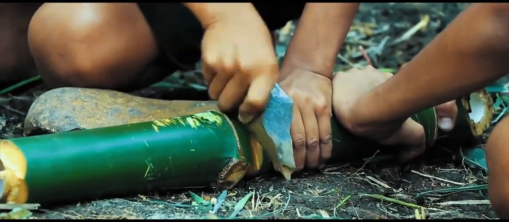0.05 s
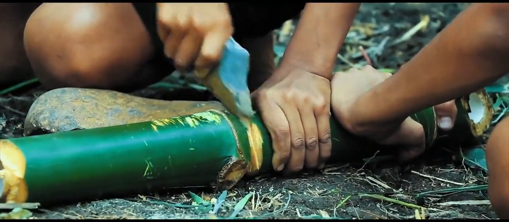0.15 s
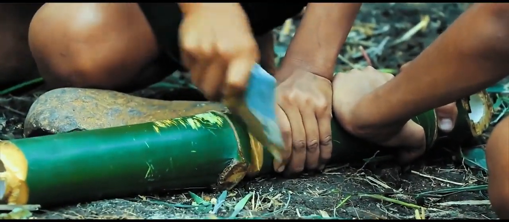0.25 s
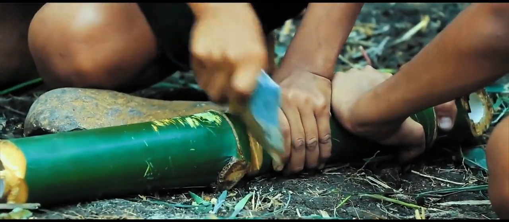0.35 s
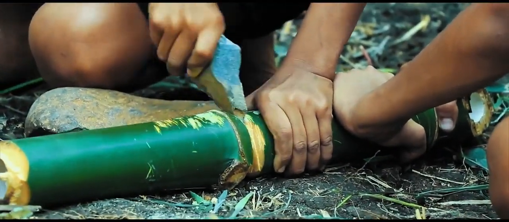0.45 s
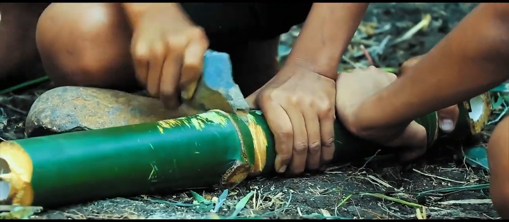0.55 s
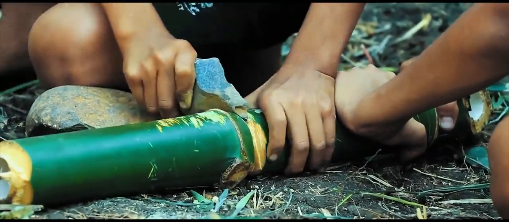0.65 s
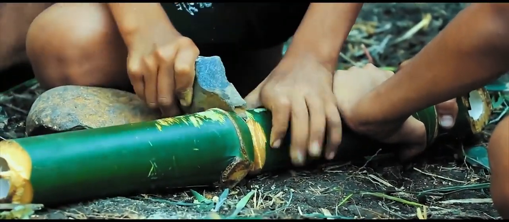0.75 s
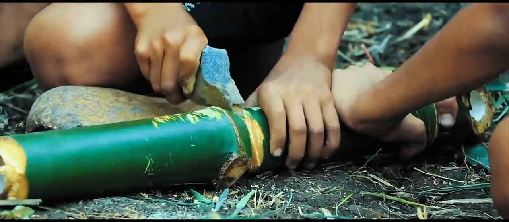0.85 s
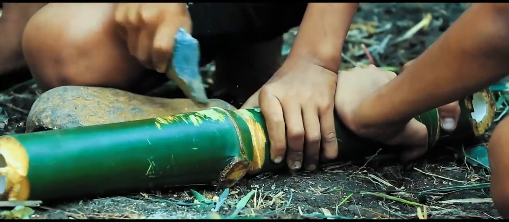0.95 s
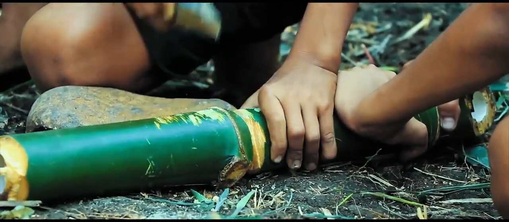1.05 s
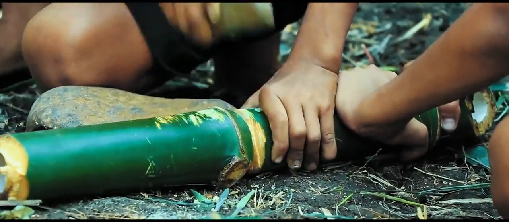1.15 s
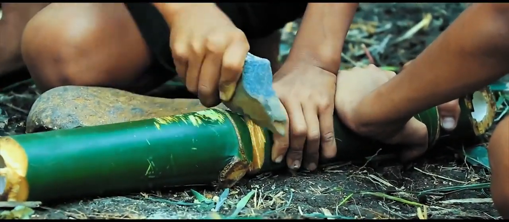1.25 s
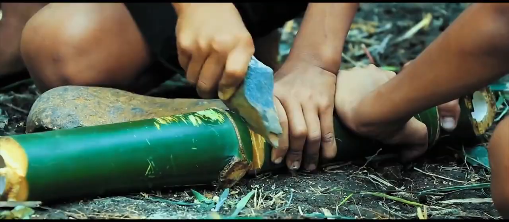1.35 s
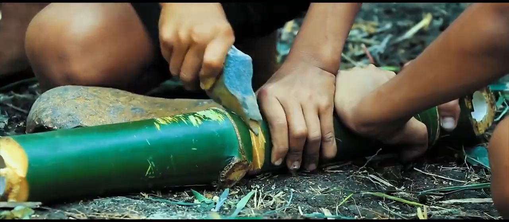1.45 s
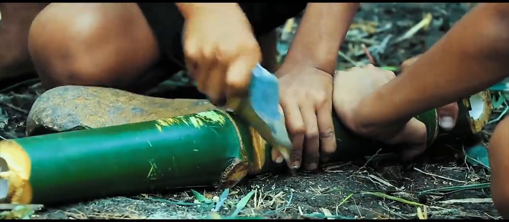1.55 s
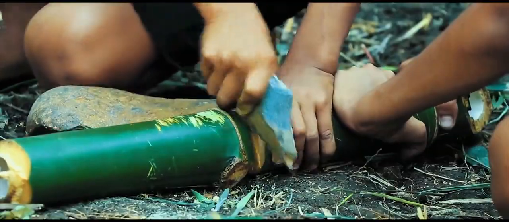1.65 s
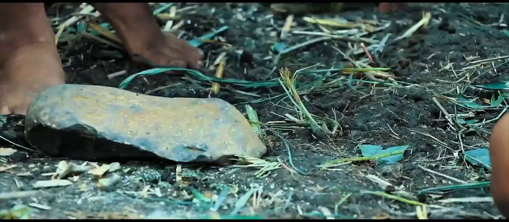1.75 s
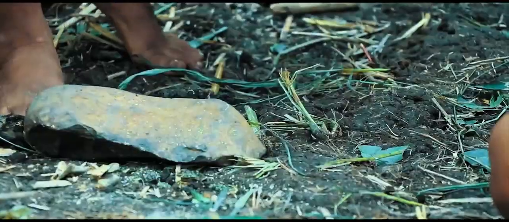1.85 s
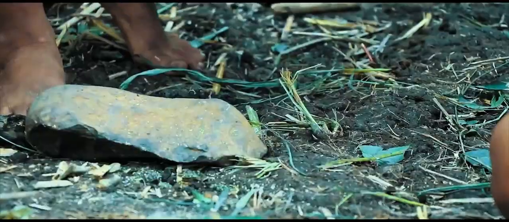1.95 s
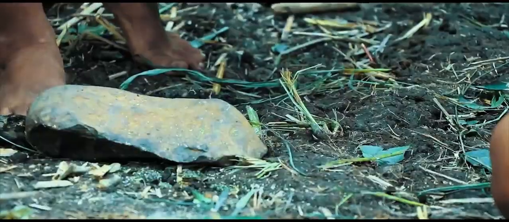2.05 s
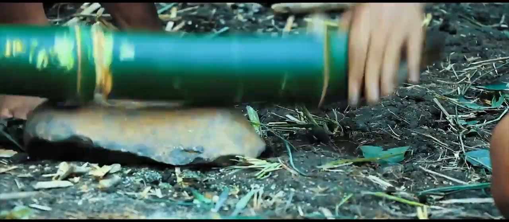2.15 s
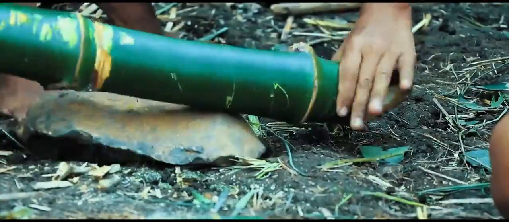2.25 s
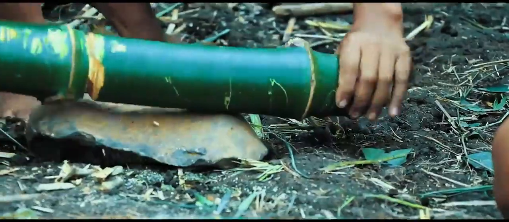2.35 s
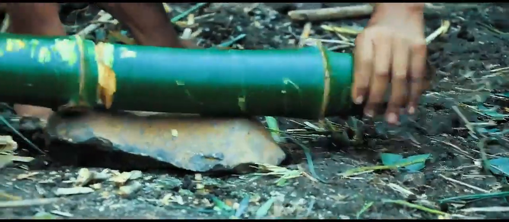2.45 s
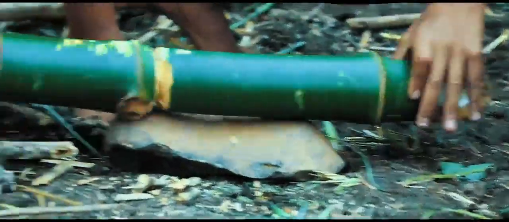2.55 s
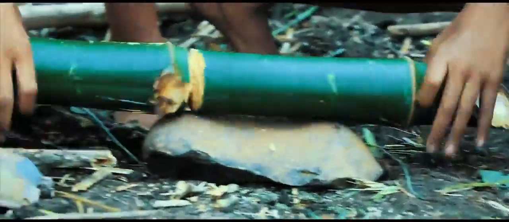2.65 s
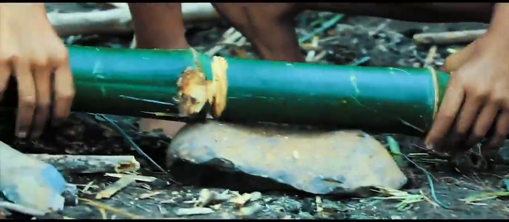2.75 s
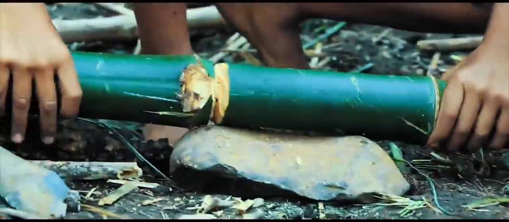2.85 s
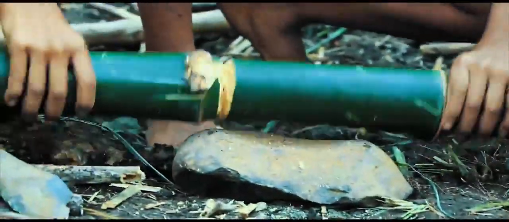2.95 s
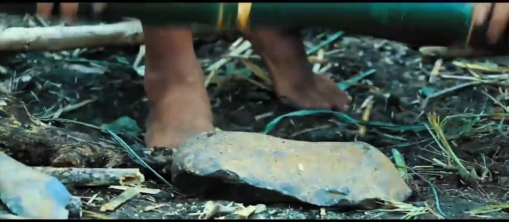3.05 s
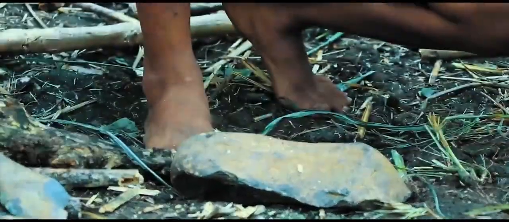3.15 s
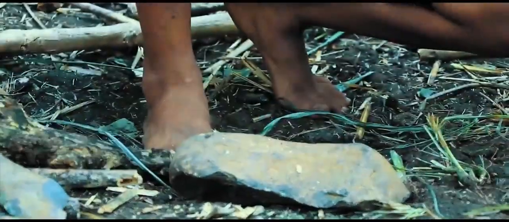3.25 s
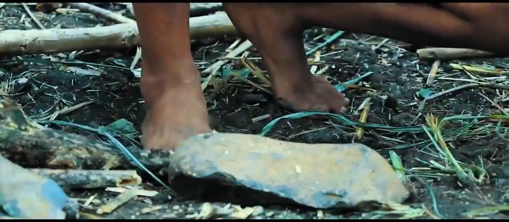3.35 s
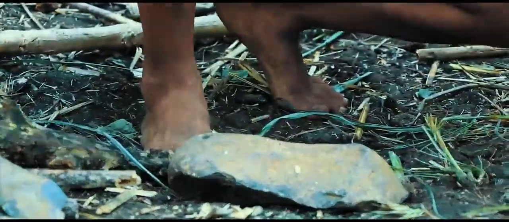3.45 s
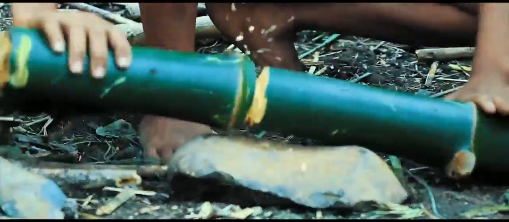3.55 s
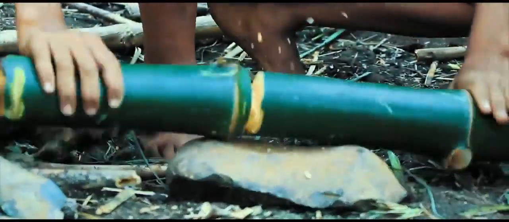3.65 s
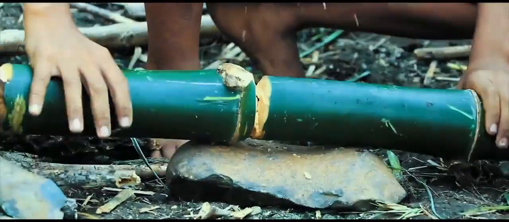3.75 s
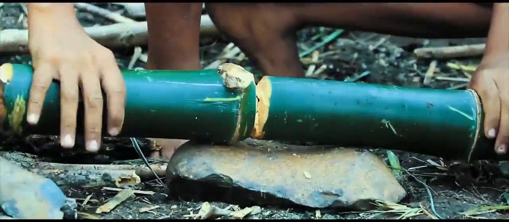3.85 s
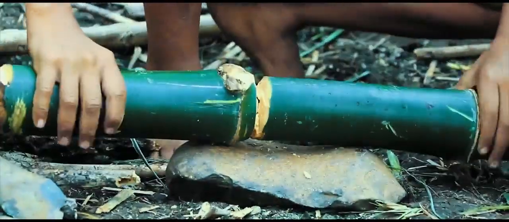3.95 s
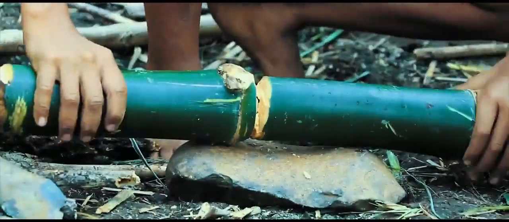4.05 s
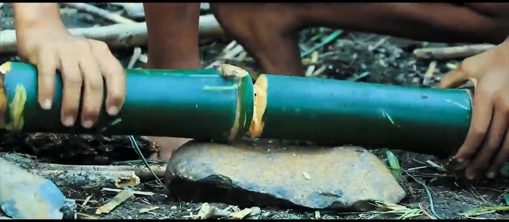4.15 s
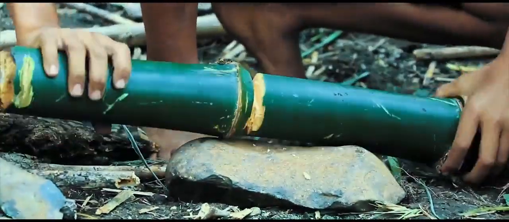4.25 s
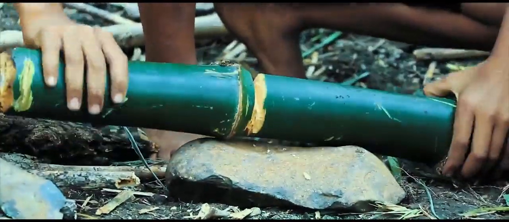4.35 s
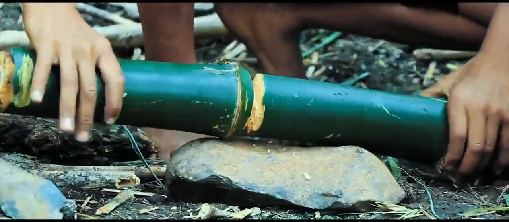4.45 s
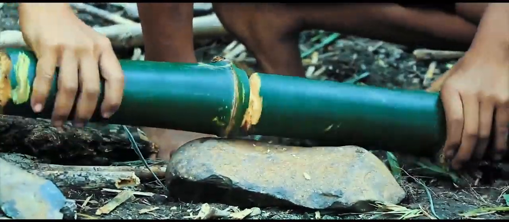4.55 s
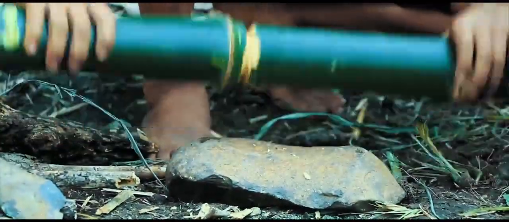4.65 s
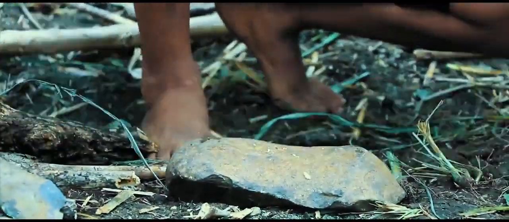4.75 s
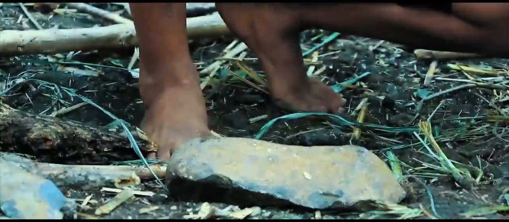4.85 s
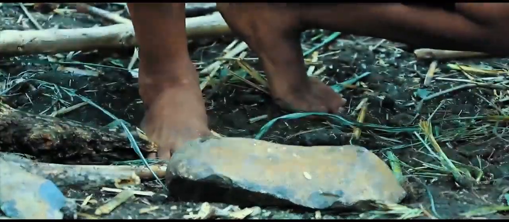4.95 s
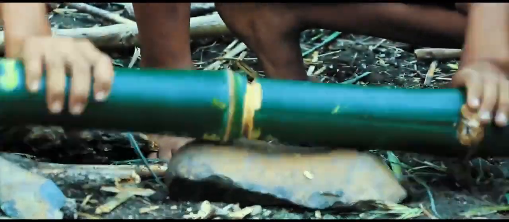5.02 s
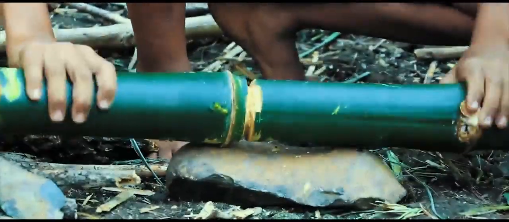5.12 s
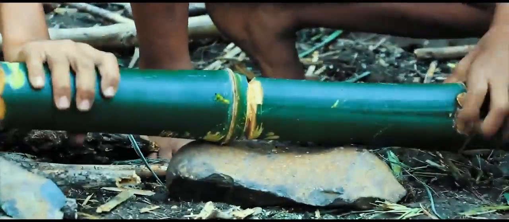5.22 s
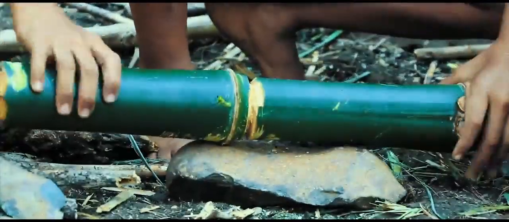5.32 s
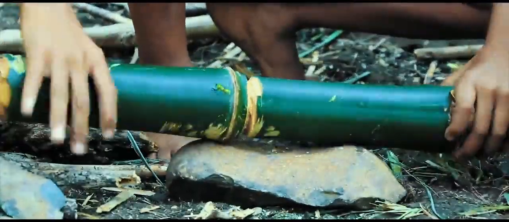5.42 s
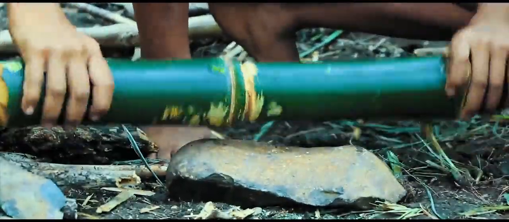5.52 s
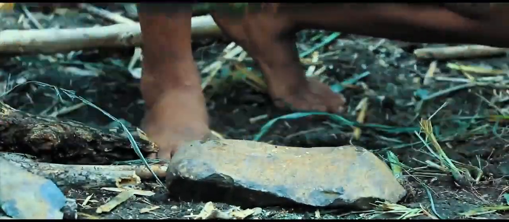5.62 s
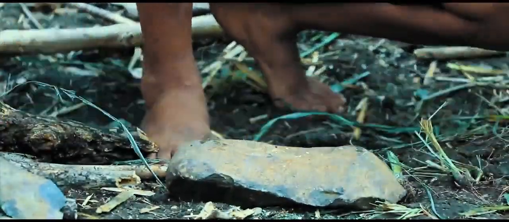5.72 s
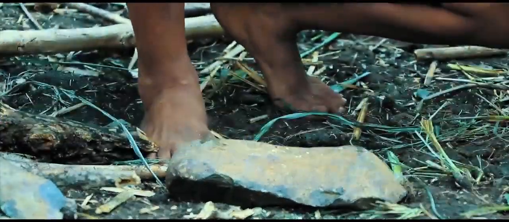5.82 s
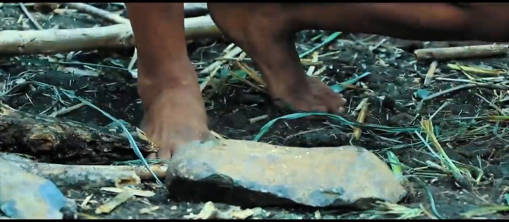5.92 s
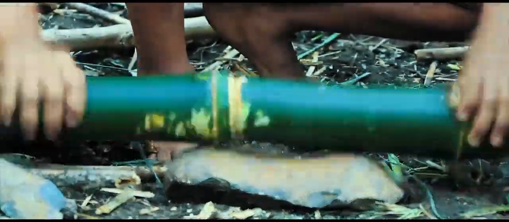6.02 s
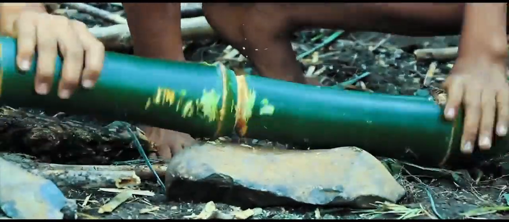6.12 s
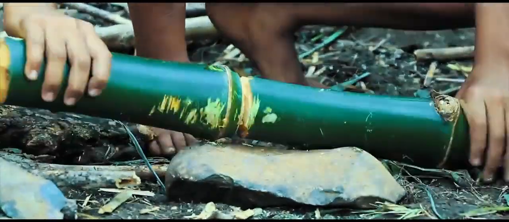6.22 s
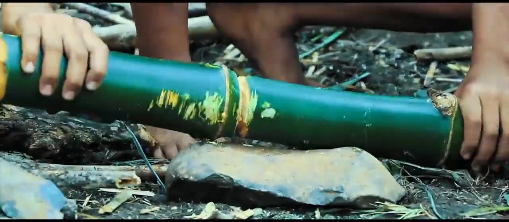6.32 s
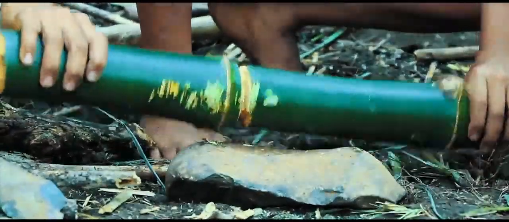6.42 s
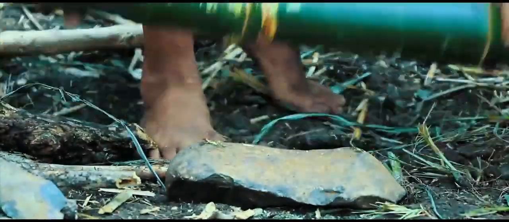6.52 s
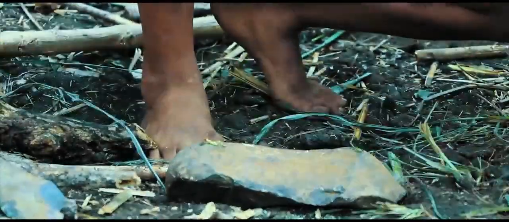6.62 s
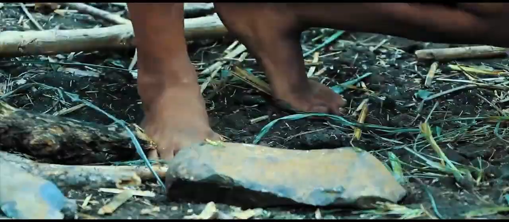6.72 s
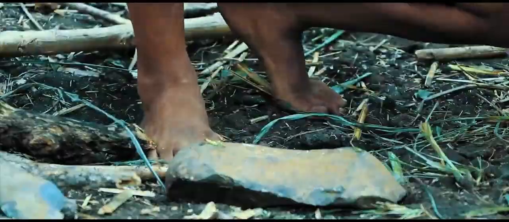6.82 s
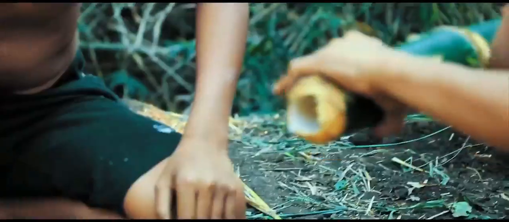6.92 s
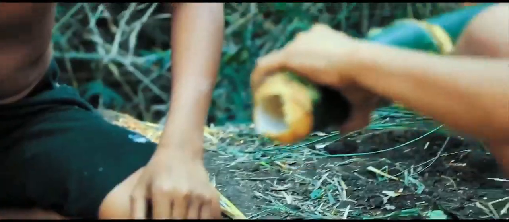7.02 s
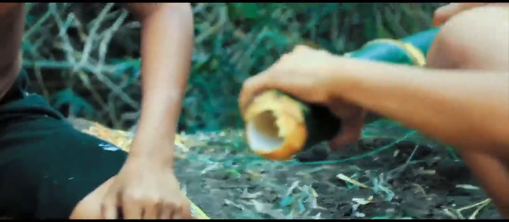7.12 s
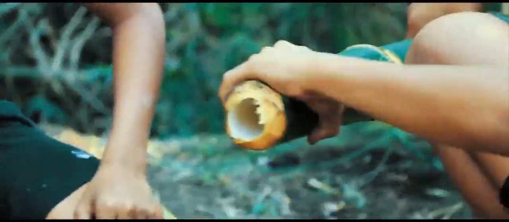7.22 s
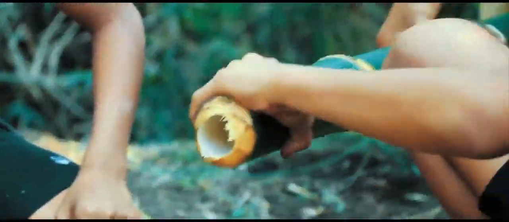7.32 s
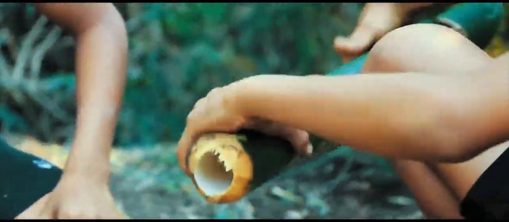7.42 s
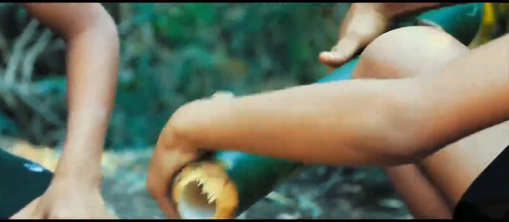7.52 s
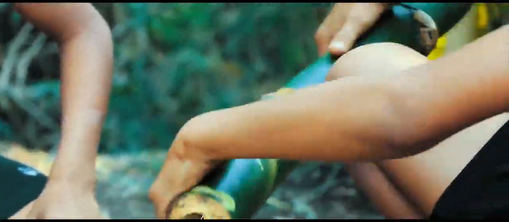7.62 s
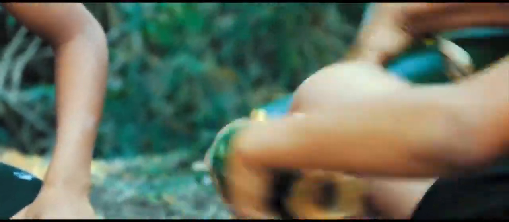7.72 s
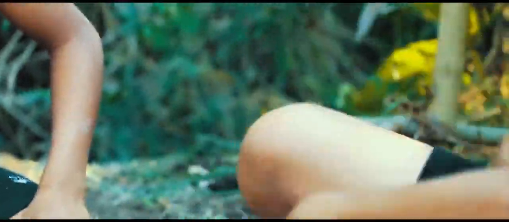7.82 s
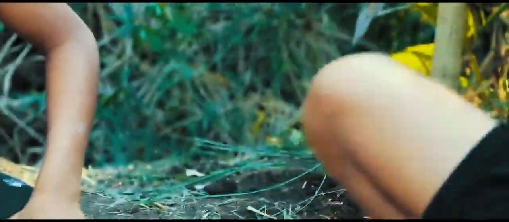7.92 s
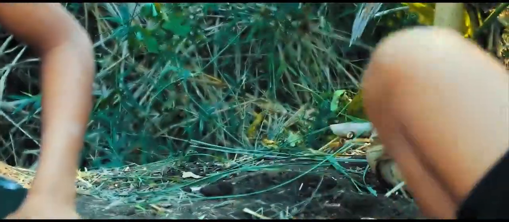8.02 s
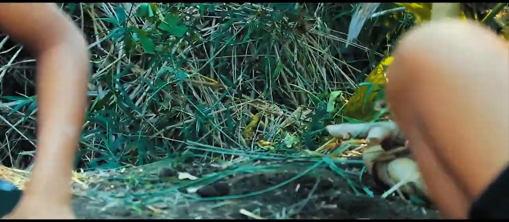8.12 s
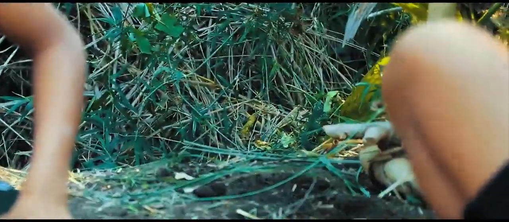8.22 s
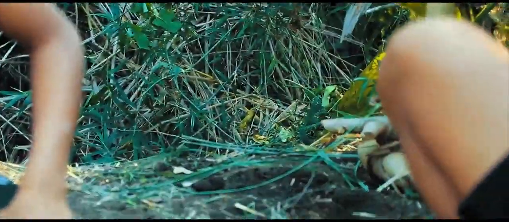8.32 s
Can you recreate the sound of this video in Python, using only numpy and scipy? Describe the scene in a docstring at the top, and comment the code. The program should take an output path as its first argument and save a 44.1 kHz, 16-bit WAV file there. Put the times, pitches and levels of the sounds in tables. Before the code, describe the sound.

A stone blade pecks and scrapes at green bamboo, then the tube slams four times on rock and its fibres rip, outdoors among insects.

```python
"""A forest floor, a spaced stereo pair close to green bamboo; insects hiss, a far bird trills, faint hoots pass.
First a stone blade pecks and scrapes at the tube: snapping fibres drive the modes of its wall and air.
From 2.2 s the tube is slammed on a rock four times, with rebounds, soil bumps, knocks, clicks and rubs.
Near 7.8 s its fibres strain and rip in dense snaps, a strip splits with falling pitch, and bits settle.
Ground and trees scatter the contacts and the bird back to the microphones."""
import sys
import numpy as np
from scipy import signal
from scipy.fft import rfft, irfft, next_fast_len
from scipy.io import wavfile
from scipy.ndimage import uniform_filter1d

SR = 44100
rng = np.random.default_rng(int(sys.argv[2]) if len(sys.argv) > 2 else 0)


def wav_out(sig):
    """Save sig, one row per channel (or a flat mono array), as 16-bit PCM at SR to the path in sys.argv[1]."""
    wavfile.write(sys.argv[1], SR, np.round(np.clip(np.atleast_2d(sig).T, -1, 1) * 32767).astype(np.int16))


N = 369544

# forest air, relative spectrum: (frequency [Hz], density [dB per Hz])
AIR_SPECTRUM = [(20, -15), (35, -5), (55, 2.5), (80, -6), (170, -10.5), (300, -9.5), (600, -14.5),
                (1300, -18), (2000, -22), (5300, -29), (7500, -28.5), (11000, -34.5), (15500, -46.5)]
# forest air over time: (time [s], level [dB])
AIR_LEVEL = [(0, -48), (.6, -52), (.9, -49), (1.3, -52), (4.2, -53), (8.38, -52)]
# insect bands: (centre [Hz], width [Hz], level [dB])
INSECT_BANDS = [(4516, 240, -77), (6650, 680, -68), (7640, 40, -75), (7900, 220, -75)]
# likeness of the air at the two microphones: (frequency [Hz], correlation [-1 to 1])
MIC_LIKENESS = [(60, 0.84), (180, 0.34), (550, 0.26), (1650, 0.04), (4970, 0.01), (15000, 0.03)]
# left minus right of the microphone pair: (frequency [Hz], difference [dB])
MIC_BALANCE = [(100, 1.26), (400, 1.85), (650, 1.29), (870, 3.43), (1050, -1.5), (1320, 3.89), (1700, -2.5),
               (2200, -4), (3000, -2), (12000, -2)]
# faint hoots: (time [s], level of the lower tone [dB])
HOOTS = [(.017, -48.5), (3.461, -51.5), (7.03, -49.5)]
# bird trills: (start [s], end [s], level of the full notes [dB])
TRILLS = [(-.225, .3, -50), (0.942, 1.47, -53), (1.848, 2.37, -51), (3.099, 3.55, -49.5), (4.482, 5.0, -50),
          (5.711, 6.15, -51), (6.863, 6.97, -53), (7.34, 7.68, -53)]
# relative colour of the echo from the trees: (frequency [Hz], level [dB])
TREE_COLOUR = [(100, -13), (400, -10), (900, -4), (1700, -5), (3300, -2), (5000, -4.5), (9000, -1.5),
               (15000, -4.5)]
# relative colour of the reflections from the ground: (frequency [Hz], level [dB])
GROUND_COLOUR = [(300, -9), (1200, -1), (6000, 0), (12000, -4)]
# modes of the tube wall at ring length 1: (frequency [Hz], relative level [dB], t60 [s])
WALL_MODES = [(787, -1, 0.042), (888, 2, 0.044), (1043, 0.5, 0.066), (1190, 0.5, .04), (1425, -0.5, 0.037),
              (1633, 2, 0.054), (1800, -5, 0.046), (2100, -0.5, 0.036), (2359, -0.5, 0.038),
              (2520, -1, 0.031), (2816, -6.5, 0.051), (2980, -4, 0.033), (3313, -3.5, 0.043),
              (3502, -3, .035), (3920, -15, 0.089)]
# short high modes of splitting fibres at ring length 1: (frequency [Hz], relative level [dB], t60 [s])
SPLINTER_MODES = [(4550, -3, 0.02), (5870, -8, 0.065), (6550, 1.5, 0.025), (6670, 5, .035),
                  (7500, -1.5, 0.032), (7890, -3, 0.035), (9800, -7.5, 0.079)]
# dull give of the tube against hands and ground, ring length 1: (frequency [Hz], relative level [dB], t60 [s])
THUD_MODES = [(195, -3.5, 0.016), (298.2, -2, 0.026), (401.8, -0.5, .03), (570, -0.5, 0.018)]
# relative colour of the bare crack of fibres: (frequency [Hz], level [dB])
CRACK_COLOUR = [(2500, -34), (4300, -3), (6800, -2.5), (9500, -8), (12000, -12), (15500, -26)]
# soft bumps on the soil: (time [s], pitch [Hz], level [dB])
BUMPS = [(2.255, 85, -31), (5.11, 85.2, -29.5), (6.132, 104.9, -34), (8.079, 151, -26)]
# the tube rubs on hands and litter: (start [s], end [s], wall level [dB], crackle above the wall [dB])
RUBS = [(0, 0.009, -43, -13), (0.971, 1.025, -48.5, -12), (3.017, 3.025, -55.5, 5),
        (6.668, 6.713, -55.5, -2.5), (6.711, 6.726, -54.5, 4), (7.101, 7.159, -54.5, -6)]
# light clicks of chips and splinters: (time [s], wall level [dB], crack level [dB])
TICKS = [(.4748, -40, -44), (2.143, -53, -65), (6.3292, -76, -55), (6.717, -66, -44), (7.858, -44.5, -48),
         (7.9127, -50.5, -58), (7.9573, -52, -57), (8.0299, -53, -61), (8.078, -37, -49.5)]
# dull knocks as blade and tube are set down: (time [s], wall level [dB], hollow ring level [dB])
KNOCKS = [(.1114, -42.5, -55), (.208, -35.5, -58), (.381, -41, -60), (.4542, -38.5, -54), (1.429, -42, -46),
          (1.7782, -39, -62), (2.51, -52, -62), (2.585, -51.5, -60), (2.784, -56, -68), (3.781, -47.5, -49),
          (5.279, -59, -68), (8.189, -36, -37)]
# strokes of the blade: (time of the bite [s], wall level [dB], crack level [dB],
# pitch favoured by the struck spot [Hz], ring length [x], hollow ring level [dB], scrape level [dB])
CHOPS = [(.119, -33.5, -47, 1820, 0.51, -43, -47.5), (0.2311, -21.5, -45.5, 2100, 1.44, -50, -44),
         (0.3479, -23, -51, 1740, 0.89, -54, -40), (0.4853, -21.5, -47, 1940, 0.83, -49, -39),
         (1.3105, -19, -37.5, 996, 0.55, -60, -63), (1.487, -43, -69, 1800, 1.6, -63, -52),
         (1.639, -28.5, -61, 1790, 0.93, -58, -46.5), (1.8028, -20.5, -50, 2870, .2, -62, -42.5)]
# long splits: (start [s], end [s], first pitch [Hz], last pitch [Hz], level [dB])
SPLITS = [(7.777, 7.815, 1164, 870, -30)]
# the tube slammed on the rock: (time [s], thud level [dB], wall level [dB], favoured pitch [Hz],
# ring length [x], hollow ring level [dB], hollow t60 [s])
SLAMS = [(2.253, -16.5, -18.5, 2870, 0.68, -27, .32), (3.601, -22, -9.5, 1900, 1.0, -47.5, .8),
         (5.1078, -18.5, -14, 2500, .33, -42.5, 0.64), (6.1293, -20, -13.5, 2440, 0.66, -25.5, 0.49)]
# the tube's second contact just after a slam: (time [s], wall level [dB], favoured pitch [Hz], ring length [x])
REBOUNDS = [(2.268, -20.5, 3050, 1.14), (5.112, -13, 1100, .55), (6.135, -17, 1245, 0.61)]

BLOW_S = .01   # span over which the level of a blow is reckoned
CUTOFF_HZ = 15700
HOLLOW_HZ = 357   # air column of one bamboo section
SKID_S, DRAG_S, DRAG_DB = .021, .038, -4.5   # skid into each bite, then a softer drag after it
CHOPPING_STOPS_S = 1.822
CHOP_ECHO_DB, TUBE_ECHO_DB = -28.5, -23   # answer of the trees to the blade and to the handled tube
LEAD_IN_S, SOFT_STEP_S, FULL_STEP_S = .28, .045, .068   # soft opening of a trill, and its note spacings
HOOT_S, HOOT_FROM_HZ, HOOT_TO_HZ = 0.14, 400, 495
# the last fibres strain, then rip apart, and the crackle dies away
STRAIN_AT_S, RIP_AT_S, RIP_S = 7.748, 7.777, 0.042
STRAIN_DB, RIP_DB, LOOSE_FIBRES_DB, LOOSE_FIBRES_FADE_S = -43, -34, -45, 0.042


def from_db(db):
    """Decibels to gain."""
    return 10 ** (np.asarray(db) / 20)


def sized(x, seconds):
    """Scale x to the energy of a level of one held for this long."""
    return x * np.sqrt(seconds * SR / (np.sum(x ** 2, axis=-1, keepdims=True) + 1e-20))


def at_hz(points, hz):
    """Read a table on a log-frequency axis."""
    f, value = np.transpose(points)
    return np.interp(np.log(hz + 1e-3), np.log(f), value)


def coloured(x, points):
    """Filter x by the gains of a (frequency [Hz], level [dB]) table."""
    n = x.shape[-1]
    size = next_fast_len(n + SR // 20)
    gain = from_db(at_hz(points, np.fft.rfftfreq(size, 1 / SR)))
    return irfft(rfft(x, size) * gain, size)[..., :n]


def add(track, s, sound):
    """Mix a sound in at time s."""
    at = max(round(s * SR), 0)
    track[at:at + len(sound)] += sound[:max(N - at, 0)]


def forest_air():
    """A soft steady rush, most alike on both sides in the bass, with narrow insect bands above."""
    hz = np.geomspace(20, 16000, 40)
    alike = np.clip(at_hz(MIC_LIKENESS, hz), -.95, .98)
    spectrum = at_hz(AIR_SPECTRUM, hz)
    # the share of mid and side noise sets the likeness of left and right
    mid, side = (coloured(rng.standard_normal(N), np.c_[hz, spectrum + 10 * np.log10(1 + sign * alike)])
                 for sign in (1, -1))
    level_db = np.interp(np.arange(N) / SR, *np.transpose(AIR_LEVEL))
    air = sized(mid + side * [[1], [-1]], N / SR) * from_db(level_db)
    for centre, width, db in INSECT_BANDS:
        band = signal.butter(1, [centre - width / 2, centre + width / 2], "band", fs=SR, output="sos")
        hiss = signal.sosfilt(np.tile(band, (2, 1)), rng.standard_normal((2, N)))
        air = air + from_db(db) * sized(hiss, N / SR)
    return air


def hoots(octave_db=-0.5, waver=0.055):
    """A faint, rough, rising tone with its octave; slow noise wavers the pitch."""
    out, n = np.zeros(N), int(HOOT_S * SR)
    for s, db in HOOTS:
        wobble = sized(uniform_filter1d(rng.standard_normal(n), size=300), n / SR)
        hz = np.linspace(HOOT_FROM_HZ, HOOT_TO_HZ, n) * (1 + waver * wobble)
        phase = 2 * np.pi * np.cumsum(hz) / SR
        tone = np.sin(phase) + from_db(octave_db) * np.sin(2 * phase)
        add(out, s, from_db(db) * np.hanning(n) ** .5 * tone)
    return out


def bird(sweep_hz=1000, end_hz=5950, note_s=.041, soft_db=-9.0, swell_db_per_s=11, soft_reach=0.69,
         under_hz=4600, under_db=-16.0):
    """Falling whistles over a faint lower voice: quick, shallow and soft, then slower, wider and louder."""
    out, u = np.zeros(N), np.linspace(0, 1, int(note_s * SR))
    swell = np.sin(np.pi * u ** 1.3) ** 1.5
    for start, end, db in TRILLS:
        opens = start + LEAD_IN_S
        soft_times = np.arange(start, min(opens - SOFT_STEP_S, end), SOFT_STEP_S)
        soft = [(s, soft_db + swell_db_per_s * (s - start), soft_reach) for s in soft_times if s >= 0]
        full = [(s, 0, 1) for s in np.arange(opens, end, FULL_STEP_S)]
        for s, note_db, reach in soft + full:
            # each note is a little off in pitch
            hz = (end_hz + sweep_hz * reach * (1 - u)) * (1 + rng.normal(0, .003))
            lower_hz = under_hz * (1 + 0.032 * (.5 - u) + rng.normal(0, 0.014))
            whistle = np.sin(2 * np.pi * np.cumsum(hz) / SR)
            lower = np.sin(2 * np.pi * np.cumsum(lower_hz) / SR)
            add(out, s, from_db(db + note_db) * swell * (whistle + from_db(under_db) * lower))
    return out


def snaps(n, per_s, spread_db):
    """Fibres give way at random moments, with uneven force."""
    chance, size, sign = rng.random(n), rng.exponential(1, n), rng.choice([-1, 1], n)
    return (chance < per_s / SR) * sign * from_db(spread_db * np.minimum(size, 3))


def trees(x, hold_s=0.063, t60=0.57, treble_t60=0.34, rise_s=0.0057):
    """Trunks and leaves scatter sound back; the treble dies at once, the rest holds briefly, then dies."""
    t = np.arange(int(.7 * SR)) / SR
    scatter = np.array([snaps(len(t), per_s=5000, spread_db=5.5) for side in range(2)])
    scatter = coloured(scatter, TREE_COLOUR)
    scatter = scatter + 0.18 * scatter[::-1]   # some of each side reaches the other
    low = signal.sosfilt(signal.butter(1, 4000, fs=SR, output="sos"), scatter)
    low_fade = from_db(-60 * np.maximum(t - hold_s, 0) / t60)
    echo = low * low_fade + (scatter - low) * from_db(-60 * t / treble_t60)
    echo = sized(echo * (1 - np.exp(-t / rise_s)), 1 / SR)
    return signal.fftconvolve(x[None], echo, axes=1)[:, :N]


def ground(x, fade_s=0.0041):
    """Stones and soil close by send early, bright reflections, different on each side and steadily shifting."""
    t = np.arange(SR // 40) / SR
    echoes = coloured(rng.standard_normal((2, 2, len(t))), GROUND_COLOUR) * np.exp(-t / fade_s)
    here, there = (signal.fftconvolve(x[None], sized(echo, 1 / SR), axes=1)[:, :N] for echo in echoes)
    moved = np.arange(N) / SR   # blend angle, one radian a second, as when the tube is moved
    return np.cos(moved) * here + np.sin(moved) * there


def outdoors(x, echo_db):
    """A sound with its reflections from the ground and the trees."""
    return x + from_db(-12.5) * ground(x) + from_db(echo_db) * trees(x)


def ring(force, modes, length=1):
    """The force sets each mode ringing as a dying sine; neighbours swing in opposite senses."""
    out = 0
    for k, (hz, db, t60) in enumerate(modes):
        r = from_db(-60 / (max(t60 * length, 1e-3) * SR))   # decay per sample
        w = 2 * np.pi * hz / SR
        mode = signal.lfilter([0, np.sin(w)], [1, -2 * r * np.cos(w), r * r], force + 1e-18)
        out = out + (-1) ** k * from_db(db) * mode
    return out


def bumps(t60=0.027):
    """The soil answers with two or three low cycles."""
    out, t = np.zeros(N), np.arange(SR // 5) / SR
    push = 1.0 * (t == 0)
    for s, hz, db in BUMPS:
        add(out, s, from_db(db) * sized(ring(push, [(hz, 0, t60)]), BLOW_S))
    return out


def crackle(force, ring_share):
    """The bright part of a contact: the bare snaps and the short ring of splinters."""
    bare = sized(coloured(force, CRACK_COLOUR), 0.88)
    return bare + ring_share * sized(ring(force, SPLINTER_MODES, length=.5), 0.6)


def wall(push, crush, modes, length, crush_share, grain_db):
    """Push and crush drive every mode; the crush also sounds as a rough grain of its own."""
    force, rings = push + crush_share * crush, 0
    for k, (hz, db, t60) in enumerate(modes):
        # the grip shifts each mode a little from blow to blow
        shifted_hz = hz * (1 + rng.normal(0, .012))
        mode = sized(ring(force, [(shifted_hz, 0, t60)], length), 1)
        rings = rings + (-1) ** k * from_db(db) * mode
    # the grain follows the levels of the modes, falling 3 dB per octave
    peaks = [(hz, db - 3 * np.log2(hz / 1000)) for hz, db, t60 in modes]
    outline = [(250, -22), (550, -12.5)] + peaks + [(4800, -26.0), (9000, -57.5)]
    return sized(rings, 1.0) + from_db(grain_db) * sized(coloured(crush, outline), 1.0)


def strike(thud_db, wall_db, crack_db, spot_hz, hardness, length, crush_s=0.0052, crack_s=0.0037,
           spot_db=10.5, spot_octaves=0.2, thud_low_hz=110, crack_top_hz=12500):
    """One push and a few milliseconds of crushing fibres; hardness is in dB per octave."""
    t, length = np.arange(SR // 2) / SR, max(length, .1)
    push = 1.0 * (t == 0)
    no_rumble = signal.butter(2, thud_low_hz, "high", fs=SR, output="sos")
    blunt = signal.butter(2, crack_top_hz, fs=SR, output="sos")
    fibres = snaps(len(t), per_s=9900, spread_db=-0.5)
    crush = sized(fibres * np.exp(-t / (crush_s * length)), 1 / SR)
    # the struck spot favours the modes near one pitch, a hard contact the high ones
    modes = []
    for hz, db, t60 in WALL_MODES:
        favour_db = spot_db * np.exp(-(np.log2(hz / spot_hz) / spot_octaves) ** 2)
        modes.append((hz, db + hardness * np.log2(hz / 1700) + favour_db, t60))
    knock = wall(push, crush, modes, length, crush_share=0.47, grain_db=-1.0)
    thud = signal.sosfilt(no_rumble, ring(push + .5 * crush, THUD_MODES, np.sqrt(length)))
    crack_force = fibres * np.exp(-t / (crack_s * length)) + 2 * push
    crack = signal.sosfilt(blunt, crackle(crack_force, ring_share=0.57))
    parts = [(thud_db, thud), (wall_db, knock), (crack_db, crack)]
    return sum(from_db(db) * sized(x, BLOW_S) for db, x in parts)


def hollow(db, t60):
    """The air inside the tube rings on after a contact."""
    t = np.arange(SR // 2) / SR
    return np.sin(2 * np.pi * HOLLOW_HZ * t) * from_db(db - 60 * t / max(t60, .05))


def stroke(span, db, attack_s=0.0045, release_s=.004):
    """Pressure that rises quickly, holds until the span ends and lets go."""
    t = np.arange(SR // 3) / SR
    return from_db(db) * np.clip(t / attack_s, 0, 1) * np.exp(-np.maximum(t - span, 0) / release_s)


def scrape(pressure, thud_db, crack_db, hollow_share=0.62, hollow_t60=0.24, catch_db=3.5, rasp_tilt_db=2.0):
    """Dense snaps into the tube, bunched as fibres catch and let go; levels are relative to the wall."""
    n = len(pressure)
    catches = sized(uniform_filter1d(rng.standard_normal(n), size=130), n / SR)
    force = pressure * from_db(catch_db * catches) * snaps(n, per_s=4000, spread_db=0.5)
    air_ring = sized(ring(force, [(HOLLOW_HZ, 0, hollow_t60)]), 0.68)
    thud = sized(ring(force, THUD_MODES), 1.0) + hollow_share * air_ring
    # the tilt is in dB per octave
    tilted = [(hz, db + rasp_tilt_db * np.log2(hz / 1700), t60) for hz, db, t60 in WALL_MODES[:-1]]
    rasp = ring(force, tilted, length=0.43)
    crack = crackle(force, ring_share=1.0)
    seconds = np.sum(pressure ** 2) / SR   # every part takes the energy of the pressure
    return sum(from_db(db) * sized(x, seconds) for db, x in [(thud_db, thud), (0, rasp), (crack_db, crack)])


def handling(knock_thud_db=5.5, knock_crack_db=-29.0, tick_thud_db=-13.0):
    """Soft knocks, light clicks and rubs, all on the same tube."""
    out = np.zeros(N)
    for s, db, hollow_db in KNOCKS:
        knock = strike(db + knock_thud_db, db, db + knock_crack_db, spot_hz=810, hardness=-4.5, length=0.92)
        add(out, s, knock + hollow(hollow_db, t60=.21))
    for s, db, crack_db in TICKS:
        add(out, s, strike(db + tick_thud_db, db, crack_db, spot_hz=2200, hardness=.3, length=1.0))
    for start, end, db, crack_db in RUBS:
        add(out, start, scrape(stroke(end - start, db), thud_db=-5.5, crack_db=crack_db))
    return out


def chops(full_db=-21, thud_db=-26.5, thud_follows=0.57, hardness=-4.0, harder_per_db=0.36):
    """The blade skids, bites and drags on; a weaker bite is softer and relatively more thud."""
    out = np.zeros(N)
    for s, db, crack_db, spot_hz, length, hollow_db, scrape_db in CHOPS:
        effort = db - full_db
        bite_thud_db = thud_db + thud_follows * effort
        bite = strike(bite_thud_db, db, crack_db, spot_hz, hardness + harder_per_db * effort, length)
        add(out, s - SKID_S, scrape(stroke(SKID_S, scrape_db), thud_db=4.0, crack_db=-11.5))
        add(out, s, bite + hollow(hollow_db, t60=0.53))
        add(out, s, scrape(stroke(DRAG_S, scrape_db + DRAG_DB), thud_db=1.5, crack_db=-9.5))
    return out


def splits(wall_hz=2090, t60=0.036):
    """The strip peeling off rings lower as it lengthens; the wall it leaves keeps its pitch."""
    out, t = np.zeros(N), np.arange(SR // 6) / SR
    for start, end, first_hz, last_hz, db in SPLITS:
        span = max(end - start, .01)
        force = snaps(len(t), per_s=3900, spread_db=6.0) * (t < span)
        # each snap starts a dying ring that follows the falling pitch
        pitch_hz = np.interp(t, [0, span], [first_hz, last_hz])
        turn = np.exp(2j * np.pi * np.cumsum(pitch_hz) / SR)
        strip = (turn * signal.lfilter([1], [1, -from_db(-60 / (t60 * SR))], force / turn)).real
        both = sized(strip, 0.68) + sized(ring(force, [(wall_hz, 0, t60)]), 0.85)
        add(out, start, from_db(db) * sized(both, span))
    return out


def tear(hollow_db=-37):
    """Fibres strain and rip in a bright crackle; the freed tube rings hollow."""
    out = np.zeros(N)
    strain = stroke(RIP_AT_S - STRAIN_AT_S, STRAIN_DB, attack_s=.001)
    rip = stroke(RIP_S, RIP_DB) + stroke(RIP_S, LOOSE_FIBRES_DB, release_s=LOOSE_FIBRES_FADE_S)
    add(out, STRAIN_AT_S, scrape(strain, thud_db=-19.0, crack_db=6.5))
    add(out, RIP_AT_S, scrape(rip, thud_db=-17.5, crack_db=7.5))
    add(out, RIP_AT_S + RIP_S, hollow(hollow_db, t60=0.4))
    return out


def slams(crack_db=-7.5, hardness=2.0, rebound_thud_db=-13.5, rebound_crack_db=-16.5, rebound_hardness=-0.8):
    """Rock is hard: the wall cracks brightly, and the tube's second contact is mostly ring."""
    out = np.zeros(N)
    for s, thud_db, db, spot_hz, length, hollow_db, hollow_t60 in SLAMS:
        blow = strike(thud_db, db, db + crack_db, spot_hz, hardness, length)
        add(out, s, blow + hollow(hollow_db, hollow_t60))
    for s, db, spot_hz, length in REBOUNDS:
        add(out, s, strike(db + rebound_thud_db, db, db + rebound_crack_db, spot_hz, rebound_hardness, length))
    return out


def scene(bird_echo_db=0.5):
    """The tube is close and nearly dry, the bird far among the trees; the chopping and its echo stop dead."""
    stop = np.clip((CHOPPING_STOPS_S - np.arange(N) / SR) / BLOW_S, 0, 1)
    chopping = outdoors(chops(), CHOP_ECHO_DB) * stop
    tube = outdoors(slams() + handling() + tear() + splits() + bumps(), TUBE_ECHO_DB)
    sound = chopping + tube + outdoors(bird(), bird_echo_db) + hoots()
    # each microphone takes half of the balance
    left, right = (coloured(channel, [(hz, sign * db / 2) for hz, db in MIC_BALANCE])
                   for channel, sign in zip(sound, (1, -1)))
    # the sound reaches the left microphone a fraction of a sample later
    left = signal.lfilter([.2, 1], [1, .2], left)
    return np.array([left, right]) + forest_air()


def record(dry):
    """The recorder cuts off peaks beyond full scale, then a steep low-pass removes the extreme treble."""
    clipped = np.clip(dry, -1, 1)
    return signal.sosfilt(signal.ellip(10, .1, 80, CUTOFF_HZ, fs=SR, output="sos"), clipped)


dry = scene()
out = record(dry)
wav_out(out)
```